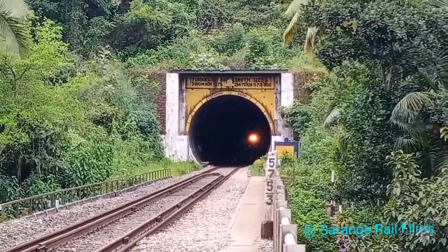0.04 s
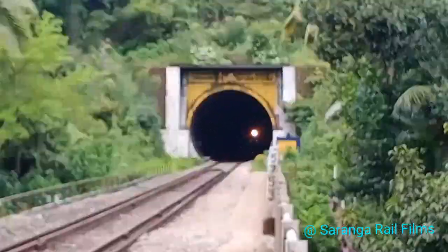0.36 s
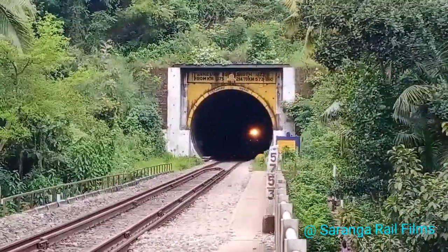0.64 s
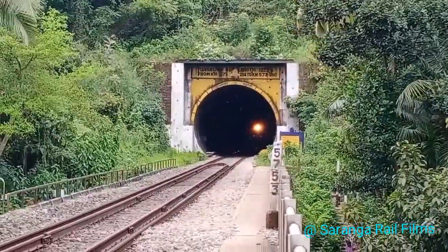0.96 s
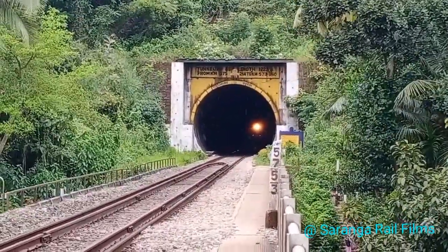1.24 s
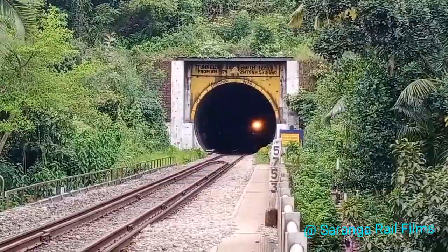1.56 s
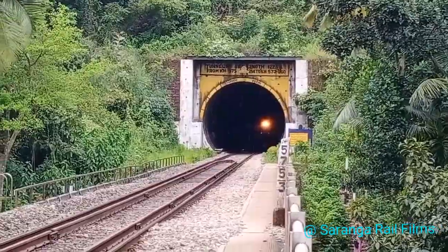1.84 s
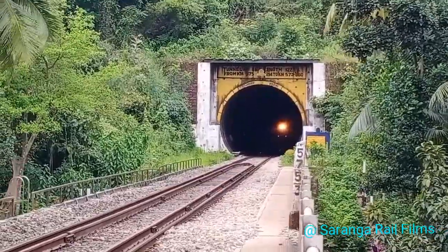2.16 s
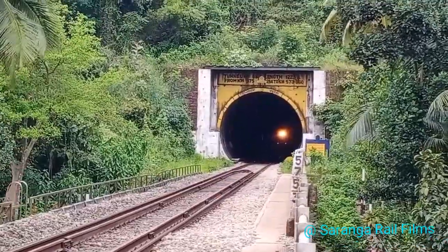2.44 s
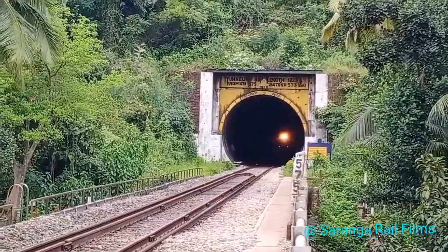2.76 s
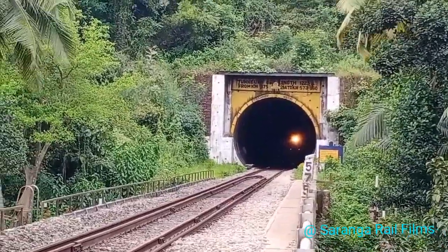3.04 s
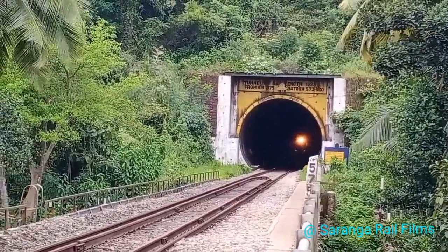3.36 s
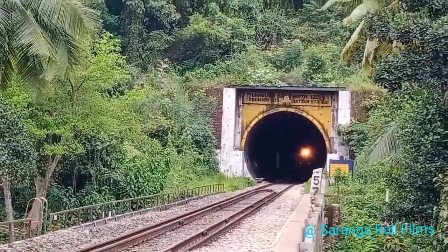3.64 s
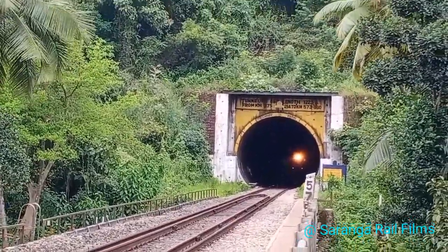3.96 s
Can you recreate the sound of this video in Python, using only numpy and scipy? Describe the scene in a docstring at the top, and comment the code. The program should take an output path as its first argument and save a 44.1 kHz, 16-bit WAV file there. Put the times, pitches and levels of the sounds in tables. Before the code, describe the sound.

A diesel train approaches deep inside a tunnel, with a low throbbing boom and a hollow wheel roar that swells and fades. Outside, leaves hiss softly and insects buzz, with quick rasping calls mostly before 1.6 seconds. From about 0.9 seconds, a few dry ticks snap close on the left. The boom grows louder near 2 seconds, and from about 3 seconds faint, very high chirps come from the right.

```python
"""On the track in front of a tunnel portal, stereo microphone, a diesel train approaching deep inside.
From the start the bore turns its exhaust into a throbbing boom near 100 Hz and the wheel roar swells
and fades; out in the open, foliage hisses and insects buzz and call. Just before 1 s comes the first
of a few dry ticks close by. Near 2 s the boom grows louder, and from about 3 s an insect adds very
high chirps on the right."""
import sys
import numpy as np
from scipy import signal
from scipy.fft import rfft, irfft, next_fast_len
from scipy.io import wavfile
from scipy.ndimage import uniform_filter1d, map_coordinates

SR = 44100
rng = np.random.default_rng(int(sys.argv[2]) if len(sys.argv) > 2 else 0)


def int16_out(signal):
    """Quantize to a 16-bit WAV file."""
    q = np.round(np.clip(np.atleast_2d(signal).T, -1, 1) * 32767)
    wavfile.write(sys.argv[1], SR, q.astype(np.int16))


N = 176400
T = np.arange(N) / SR

# pitch line of the exhaust boom (t/s, f/Hz)
EXHAUST_PITCH = [(0, 92.6), (.21, 105.3), (.38, 92.16), (.7, 101.3), (.86, 92.65), (1.03, 96.97),
                 (1.25, 106.7), (1.5, 93.95), (1.87, 98.2), (2.3, 97), (2.55, 100.4), (2.8, 98.6),
                 (3.1, 101.2), (3.3, 109), (3.5, 101.8), (3.8, 106.9), (4, 111.8)]


def amp(db):
    """Decibels to gain."""
    return 10 ** (np.asarray(db) / 20)


def unit(x):
    """Scale to rms 1."""
    return x / np.sqrt(np.mean(x ** 2) + 1e-20)


def curve(rows):
    """(t/s, value) points as one value per sample."""
    return np.interp(T, *np.transpose(rows))


def wobble(rate):
    """A smooth random curve, rate knots a second."""
    return map_coordinates(rng.standard_normal(int(N * rate / SR) + 4), [T * rate])


def filtered(x, response):
    """x times a response of frequency."""
    size = next_fast_len(N + SR // 2)
    return irfft(rfft(x, size) * response(np.fft.rfftfreq(size, 1 / SR)), size)[..., :N]


def pan(left_db):
    """Channel gains for a left-right level difference."""
    return amp([[left_db / 2], [-left_db / 2]])


def swell(at, length):
    """A rounded rise and fall around a moment, about length seconds wide at half height."""
    return np.cos(np.pi / 2 * np.clip((T - at) / (0.94 * length), -1, 1)) ** 2


def narrow(hz, width_hz):
    """A narrow band of noise, rms 1."""
    phase = 2 * np.pi * hz * T
    return unit(wobble(2 * width_hz) * np.sin(phase) + wobble(2 * width_hz) * np.cos(phase))


def noise(spectrum, side_db, left_db, patchy_db):
    """Mid-side noise with patches of random gain; the spectrum sets its colour, not its level."""
    bins = signal.stft(rng.standard_normal((2, N)), nperseg=1024)[2]
    patches = uniform_filter1d(rng.standard_normal(bins.shape[1:]), size=3, axis=0)
    patches = uniform_filter1d(patches, size=5, axis=1)
    pair = signal.istft(bins * amp(patchy_db * unit(patches)), nperseg=1024)[1][:, :N]
    freqs, db = np.transpose(spectrum)
    mid, side = filtered(pair, lambda hz: amp(np.interp(np.log(hz + 1), np.log(freqs), db)))
    side = amp(side_db) * unit(side)
    return np.array([unit(mid) + side, unit(mid) - side]) * pan(left_db)


def exhaust():
    """Far inside, the bore passes one exhaust order in throbs; weak ones thud and wander more."""
    # exhaust throbs (t/s, length/s, relative level/dB)
    throbs = [(0.05, 0.064, -35), (0.201, 0.061, -35), (.268, 0.042, -38), (0.378, 0.041, -31.5),
              (0.44, 0.032, -41.5), (0.532, 0.077, -36.5), (0.63, 0.044, -37), (0.686, 0.037, -33.5),
              (0.849, 0.048, -31.5), (0.91, 0.065, -40), (1.007, 0.055, -32.5), (1.061, 0.028, -32.5),
              (1.164, 0.034, -29), (1.278, 0.086, -34), (1.341, 0.038, -34.5), (1.416, 0.031, -39),
              (1.49, 0.056, -36.5), (1.591, 0.044, -50.5), (1.713, 0.079, -33.5), (1.787, 0.055, -34.5),
              (1.871, 0.053, -27), (1.95, 0.052, -23.5), (2.029, 0.055, -21.5), (2.109, 0.069, -26),
              (2.203, 0.098, -23), (2.287, 0.032, -27.5), (2.353, 0.066, -28.5), (2.429, 0.056, -26.5),
              (2.529, 0.084, -36.5), (2.618, 0.13, -28.5), (2.715, 0.095, -23.5), (2.797, 0.081, -22),
              (2.868, 0.041, -23), (2.943, 0.099, -24), (3.023, 0.046, -26.5), (3.101, 0.065, -26),
              (3.172, 0.057, -31.5), (3.275, 0.077, -34.5), (3.339, 0.039, -29.5), (3.437, 0.035, -33.5),
              (3.489, 0.055, -27), (3.557, 0.072, -28), (3.616, 0.048, -28.5), (3.675, 0.042, -30),
              (3.77, 0.051, -29), (3.822, 0.032, -29.5), (3.905, 0.062, -33.5), (3.985, 0.064, -26)]
    # spectrum of the noisy part of a throb (f/Hz, level/dB)
    thud_spectrum = [(30, -20), (55, -12), (72, 0), (90, -10), (106, -12), (122, 0.5), (138, -7),
                     (160, -12), (195, -15), (225, -39), (400, -41), (800, -100)]
    boom_db, thud_db, roughness = -0.5, -15, 0.12
    bend_hz, wander_hz, span_s = 5.685, 1.71, 0.08933
    level = sum(amp(db) * swell(at, length) for at, length, db in throbs)
    unsteady = 1 / (0.25 + unit(level))
    # the pitch lifts on the crest of a throb and sags after it
    crest = level / (uniform_filter1d(level, size=int(span_s * SR)) + 1e-4) - 1
    hz = curve(EXHAUST_PITCH) + bend_hz * crest + wander_hz * unsteady * wobble(30)
    phase = 2 * np.pi * np.cumsum(hz) / SR
    tone = np.sin(phase) + roughness * (wobble(40) * np.sin(phase) + wobble(37) * np.cos(phase))
    boom = amp(boom_db) * unit(tone) * pan(left_db=3.0)
    thud = amp(thud_db) * unsteady * noise(thud_spectrum, side_db=-17, left_db=0.5, patchy_db=1.5)
    return dips() * level * (boom + thud)


def rumble():
    """The low rumble of the bore spills from the portal, straight ahead."""
    # course of the rumble (t/s, level/dB)
    level = [(0, -52), (.7, -43), (1.4, -49), (2.05, -37), (2.6, -43.5), (3.2, -41), (4, -39.5)]
    # its spectrum (f/Hz, level/dB)
    spectrum = [(20, -21), (35, -22.5), (58, -15.5), (76, -2.5), (100, 5.5), (118, 1.5), (138, -11),
                (185, -13), (225, -24), (400, -30.5), (800, -100)]
    return dips() * amp(curve(level)) * noise(spectrum, side_db=-15.5, left_db=-1.0, patchy_db=0)


def wheels():
    """Distant wheel roar rings in the bore; it flutters with a hollow midrange and the rails' rush."""
    # swells of the dull roar, the hollow band and the brighter rush (t/s, level/dB)
    roar_level = [(0, -67), (.05, -55.5), (.14, -68), (.27, -64.5), (.34, -52.5), (.43, -66.5),
                  (.52, -55.5), (.62, -50), (.8, -49.5), (1.02, -53.5), (1.15, -55.5), (1.3, -65.5),
                  (1.48, -68), (1.61, -54.5), (1.68, -46.5), (2.02, -48), (2.33, -52), (2.53, -60),
                  (2.68, -71.5), (2.86, -71), (3.25, -66.5), (3.5, -60), (3.62, -67.5), (3.92, -61),
                  (4, -60)]
    hollow_level = [(0, -85), (.5, -84), (.72, -66), (.92, -64), (1.1, -68), (1.5, -71.5), (1.8, -61),
                    (2.02, -58), (2.16, -66), (2.3, -59), (2.48, -59.5), (2.65, -78), (3.3, -71),
                    (3.65, -64.5), (3.78, -66.5), (4, -64)]
    rush_level = [(0, -56), (.2, -60), (.4, -58), (.7, -52.5), (1.05, -55), (1.25, -55.5), (1.5, -57.5),
                  (1.68, -47.5), (2.05, -51), (2.35, -52.5), (2.6, -52.5), (2.72, -61.5), (2.87, -58),
                  (3.0, -58), (3.25, -55), (3.48, -51), (3.58, -54.5), (3.75, -53.5), (4, -53)]
    # their spectra (f/Hz, level/dB)
    roar_spectrum = [(120, -19), (225, -0.5), (265, -2), (315, 2.5), (370, 3), (440, -0.5), (500, -1),
                     (555, -3), (612, -2.5), (690, -16.5), (1000, -10.5), (2000, -18), (4000, -88)]
    hollow_spectrum = [(450, -48), (660, 2.5), (750, -2.5), (870, 3.5), (1000, -3), (1400, -40)]
    rush_spectrum = [(300, -27), (650, -19), (760, -17.5), (950, -6), (1130, 3), (1250, 0), (1450, 2),
                     (1900, 3.5), (2300, -4), (2800, -5), (3500, -10.5), (4300, -12), (4800, -27.5),
                     (8000, -54)]
    # resonances of the bore (f/Hz, width/Hz, level/dB against the roar)
    modes = [(488.6, 28, -8.5), (553, 24, -5.5), (619, 20, -10.5)]
    flutter_db = 0.67 * wobble(21)
    ring = sum(amp(db) * narrow(hz, width) for hz, width, db in modes) * pan(left_db=1.0)
    roar = unit(noise(roar_spectrum, side_db=-16, left_db=4.5, patchy_db=4.0) + ring)
    rush = noise(rush_spectrum, side_db=-13.5, left_db=5.5, patchy_db=3.5)
    hollow = noise(hollow_spectrum, side_db=-10, left_db=4.0, patchy_db=5.0)
    bands = [(roar_level, roar), (hollow_level, hollow), (rush_level, rush)]
    return sum(amp(curve(level) + flutter_db) * band for level, band in bands)


def foliage():
    """Leaves beside the track hiss with a light flutter."""
    # course of the hiss (t/s, level/dB)
    level = [(0, -53.5), (.5, -54), (1.0, -53.5), (1.7, -55), (2.05, -61.5), (2.55, -55.5), (2.74, -60),
             (2.92, -56.5), (3.1, -56.5), (3.42, -52.5), (3.7, -54), (4, -54)]
    # its spectrum (f/Hz, level/dB)
    spectrum = [(200, -40), (900, -46.5), (1800, 1.5), (2300, -2), (2700, 2.5), (3400, -1), (4250, 1),
                (4750, -9.5), (5500, -6.5), (6300, -2), (7200, -10.5), (8500, -25), (10500, -18),
                (12500, -22), (15500, -22.5)]
    gain = amp(curve(level) + 0.79 * wobble(21))
    return gain * noise(spectrum, side_db=-14.5, left_db=2.5, patchy_db=4.0)


def insect_chorus():
    """Insects buzz steadily right of the microphone, their thin top shimmering further right."""
    # spectra of the buzz and its top (f/Hz, level/dB)
    buzz_spectrum = [(4000, -66), (5500, -24), (6100, -1), (6900, 5.5), (7500, -1.5), (8300, -19.5),
                     (9500, -23.5), (12000, -41)]
    shimmer_spectrum = [(5500, -41), (7000, -1.5), (7700, 0.5), (8500, -6), (9300, -15), (10500, -12),
                        (12000, -21)]
    buzz_db, shimmer_db = -61, -69.5
    flutter_db = 0.6 * wobble(18)
    buzz = noise(buzz_spectrum, side_db=-41, left_db=-3.0, patchy_db=2.5)
    shimmer = noise(shimmer_spectrum, side_db=-3.5, left_db=-11.5, patchy_db=4.5)
    return amp(buzz_db + flutter_db) * buzz + amp(shimmer_db + flutter_db) * shimmer


def insect_calls():
    """Quick rasping notes just left of centre; the shrill ones are shorter and carry an upper mode."""
    # insect notes (t/s, relative level/dB, f/Hz)
    notes = [(.056, -54, 6260), (.057, -55, 4160), (.142, -52.5, 4257), (.18, -51, 4190), (.226, -55, 4280),
             (.293, -58, 6200), (.315, -45.5, 4270), (.371, -55.5, 4259), (0.421, -49.5, 6090),
             (.442, -49, 4230), (.552, -46, 4220), (.585, -48.5, 4210), (.678, -51, 6000),
             (.682, -54.5, 4160), (.722, -57, 6060), (.798, -49, 5970), (0.844, -51, 6070),
             (.928, -51.5, 6110), (.999, -54, 6040), (1.056, -46.5, 6160), (1.061, -55, 4168),
             (1.118, -52.5, 6150), (1.201, -56.5, 6000), (1.227, -56, 4256), (1.258, -53.5, 6110),
             (1.352, -52.5, 6188), (1.393, -56, 6100), (1.489, -51, 6180), (1.547, -51, 6080),
             (1.584, -56, 6245), (1.622, -50, 6130), (2.821, -54.5, 6195), (3.072, -54, 6170),
             (3.222, -51, 6116), (3.334, -52.5, 6165), (3.47, -54, 6160), (3.728, -53, 6140)]
    gain_db, roughness, width_hz = -5, 0.68, 126.5
    overtone_ratio, overtone_db = 1.61, -19.5
    out = np.zeros(N)
    for at, db, hz in notes:
        shrill = hz > 5000
        half_s = 0.0197 if shrill else 0.032
        sounding = np.abs(T - at) < half_s
        t = T[sounding] - at
        knots = (t + half_s) * 2 * width_hz
        rasp = [map_coordinates(row, [knots], mode="mirror") for row in rng.standard_normal((3, 64))]
        phase = 2 * np.pi * hz * t
        tone = unit((1 + roughness * rasp[0]) * np.sin(phase) + roughness * rasp[1] * np.cos(phase))
        overtone = shrill * amp(overtone_db) * unit(rasp[2] * np.sin(overtone_ratio * phase))
        envelope = np.cos(np.pi / 2 * t / half_s) ** 2
        out[sounding] += amp(db + gain_db) * envelope * (tone + overtone)
    return out * pan(left_db=2)


def dips():
    """Gain of the boom and rumble, which drop for a moment now and then."""
    # dips between throbs (t/s, length/s, level/dB)
    drops = [(0.136, 0.029, -3), (0.315, 0.033, -12), (0.782, 0.023, -7), (1.104, 0.017, -15),
             (2.154, .025, -5), (3.06, 0.023, -0.5), (3.21, 0.024, -8), (3.729, 0.025, -16)]
    return amp(sum(db * swell(at, length) for at, length, db in drops))


def howls():
    """Brief hollow resonances of the bore reach the portal, roughened at the exhaust rate."""
    # resonances sounding (t/s, length/s, level/dB, f/Hz)
    resonances = [(.205, 0.055, -59, 295), (0.331, 0.034, -57, 560), (0.426, 0.081, -50.5, 312),
                  (0.518, 0.068, -53.5, 552), (0.633, 0.069, -51, 334.3), (0.743, 0.098, -54.5, 550),
                  (0.823, 0.051, -50, 306), (0.833, .06, -51.5, 246), (0.976, .08, -52.5, 312),
                  (1.01, 0.044, -53, 498), (1.073, 0.052, -53, 290), (1.242, 0.075, -58, 536),
                  (1.7, 0.13, -52, 510), (1.727, .15, -50, 304.2), (1.787, 0.079, -51, 455),
                  (1.924, 0.048, -48.5, 311), (2.04, 0.12, -52, 314.5), (2.05, .11, -46.5, 241.2),
                  (2.14, 0.072, -60.5, 508.4), (2.154, 0.096, -48, 179), (2.24, 0.056, -54.5, 622),
                  (2.26, 0.045, -53, 482), (2.364, 0.078, -53, 498), (2.39, 0.058, -57, 311.5),
                  (2.678, 0.075, -58, 339), (2.783, 0.15, -54.5, 198), (2.93, 0.081, -53, 335.6),
                  (3.012, 0.094, -49.5, 333.4), (3.057, 0.045, -48.5, 195.4), (3.169, 0.16, -55.5, 317),
                  (3.32, 0.045, -54, 331), (3.531, 0.049, -62.5, 530), (3.385, 0.068, -45.5, 324),
                  (3.6, 0.05, -47.5, 323.1), (3.688, 0.09, -45.5, 316.2), (3.706, 0.081, -57, 255),
                  (3.713, 0.04, -43.5, 199.4), (3.877, 0.2, -53, 202.7), (3.824, 0.064, -47.5, 313),
                  (3.958, 0.054, -49.5, 321)]
    growl_depth, roughness, sag_hz_per_s = 0.19, 0.58, 14
    exhaust_phase = 2 * np.pi * np.cumsum(curve(EXHAUST_PITCH)) / SR
    growl = 1 + growl_depth * (np.sin(exhaust_phase) + wobble(140))
    out = np.zeros(N)
    for at, length, db, hz in resonances:
        tone = np.sqrt(2) * np.sin(2 * np.pi * (hz * T - sag_hz_per_s * (T - at) ** 2 / 2))
        out += amp(db) * swell(at, length) * unit(tone + roughness * narrow(hz, width_hz=45))
    return out * unit(growl) * pan(left_db=5)


def insect_peeps():
    """A few short, fuzzy peeps left of the microphone."""
    # peeps (t/s, length/s, level/dB, f/Hz)
    peeps = [(0.451, 0.022, -53.5, 3200), (0.571, 0.018, -50.5, 3130), (3.35, 0.12, -53.5, 2641),
             (3.493, 0.048, -51.5, 2610)]
    out = sum(amp(db) * swell(at, length) * narrow(hz, width_hz=160) for at, length, db, hz in peeps)
    return out * pan(left_db=4.5)


def ticks():
    """Small dry snaps close by on the left: a sharp crack and a few milliseconds of splintering."""
    # snaps (t/s, peak level/dB, band centre f/Hz)
    snaps = [(0.906, -35, 2498), (1.078, -46, 7070), (2.128, -34.5, 2380), (3.078, -37, 3765),
             (3.196, -29, 1970), (3.524, -30, 3050)]
    t60_s, half_width_oct, crack = 0.03, 0.57, 19
    out = np.zeros(N)
    for at, db, hz in snaps:
        burst = rng.standard_normal(N) * (T >= at) * amp(-60 * np.abs(T - at) / t60_s)
        burst[round(at * SR)] += crack
        edges = [hz * 2 ** -half_width_oct, hz * 2 ** half_width_oct]
        snap = signal.lfilter(*signal.butter(2, edges, "bandpass", fs=SR), burst)
        out += amp(db) * snap / np.abs(snap).max()
    return out * pan(left_db=5.0)


def insect_chirps():
    """Very high chirps near 11 kHz, well to the right."""
    # chirps (t/s, length/s, level/dB)
    chirps = [(2.94, 0.03, -67.5), (3.235, 0.028, -69.5), (3.303, .035, -74), (3.888, 0.055, -62)]
    # their spectrum (f/Hz, level/dB)
    spectrum = [(10500, -50), (11130, -29), (11320, 12), (11520, -18), (12200, -35), (13800, -26),
                (14400, -7), (15400, -6), (16000, -15)]
    level = sum(amp(db) * swell(at, length) for at, length, db in chirps)
    return level * noise(spectrum, side_db=-14, left_db=-12, patchy_db=-7)


def scene():
    """The train far down the tunnel and the greenery around the microphone."""
    train = exhaust() + rumble() + howls() + wheels()
    outside = foliage() + insect_chorus() + insect_peeps() + insect_chirps() + insect_calls() + ticks()
    return train + outside


def record(dry):
    """The recorder keeps nothing above its band limit."""
    top_hz = 15800
    return filtered(dry, lambda hz: hz < top_hz)


dry = scene()
out = record(dry)
int16_out(out)
```